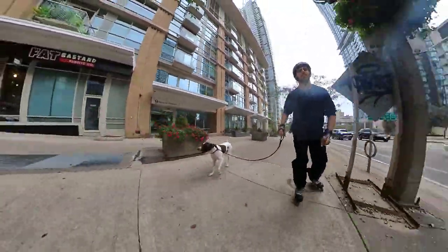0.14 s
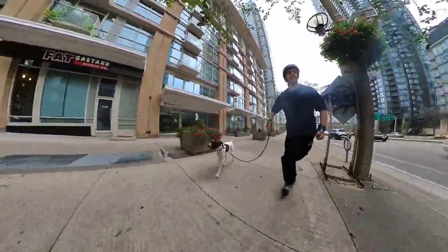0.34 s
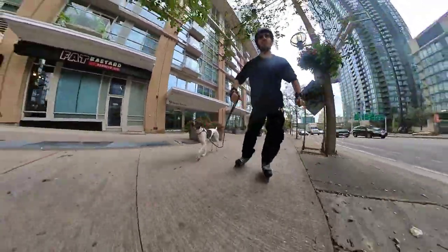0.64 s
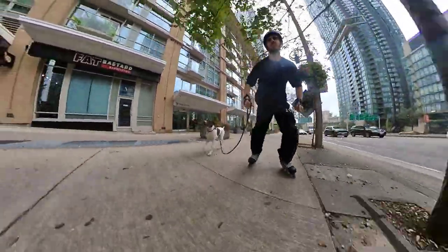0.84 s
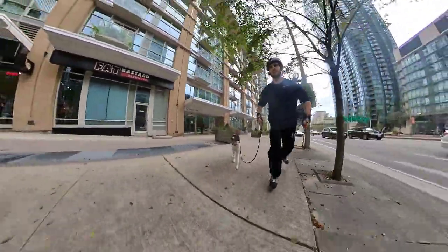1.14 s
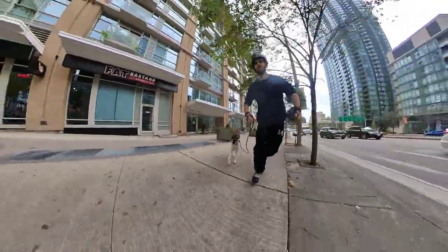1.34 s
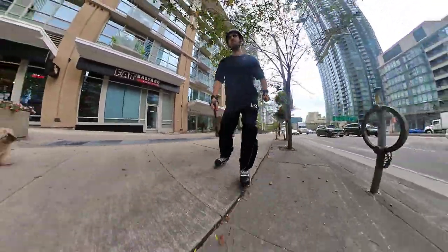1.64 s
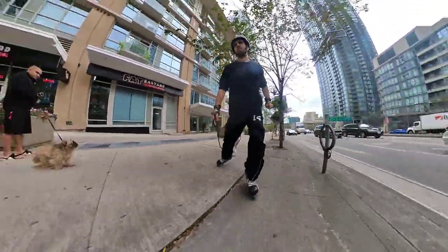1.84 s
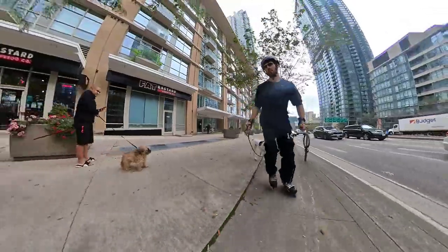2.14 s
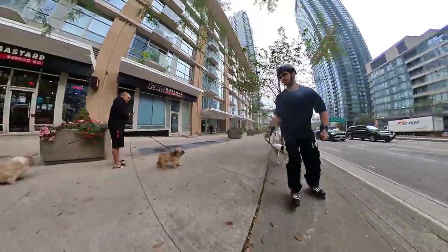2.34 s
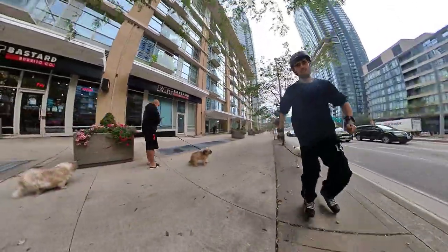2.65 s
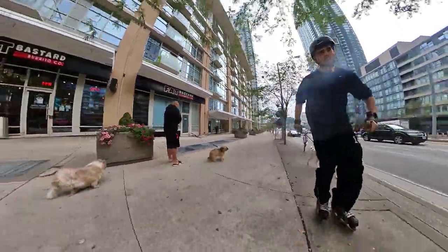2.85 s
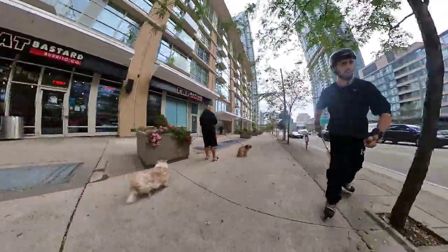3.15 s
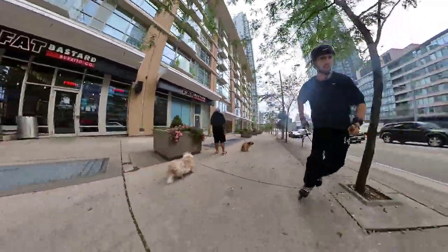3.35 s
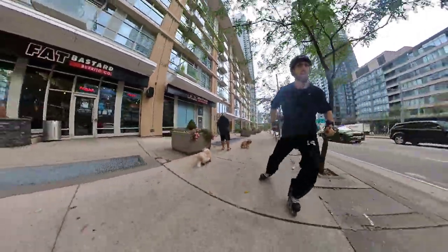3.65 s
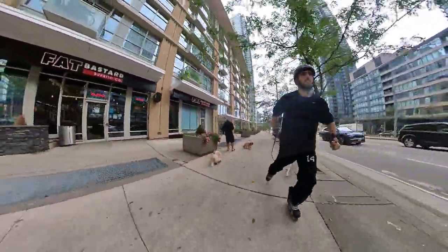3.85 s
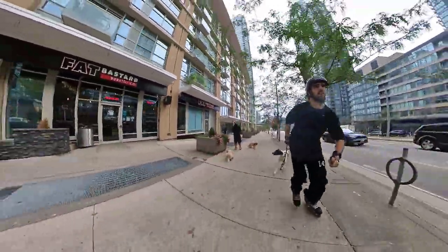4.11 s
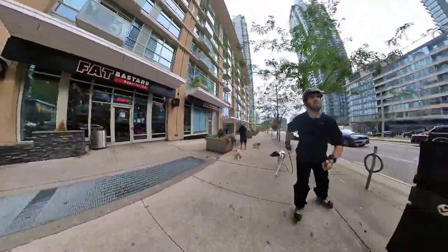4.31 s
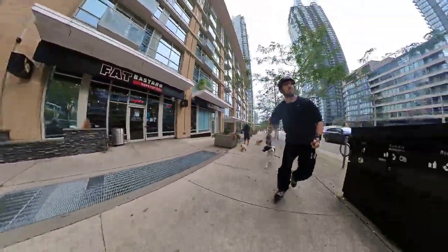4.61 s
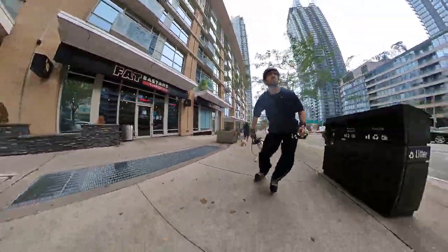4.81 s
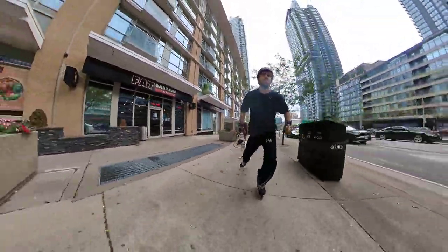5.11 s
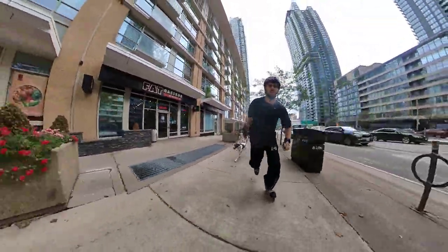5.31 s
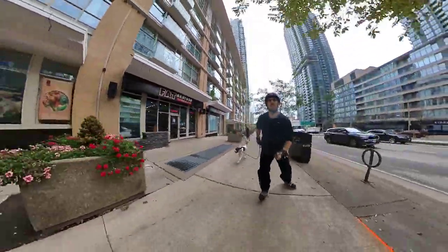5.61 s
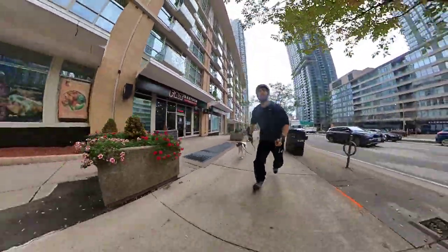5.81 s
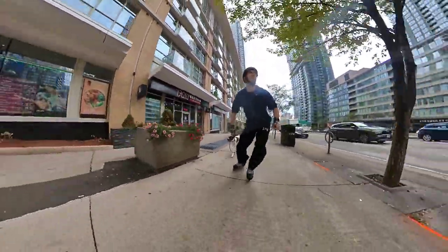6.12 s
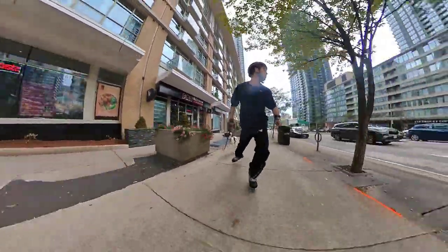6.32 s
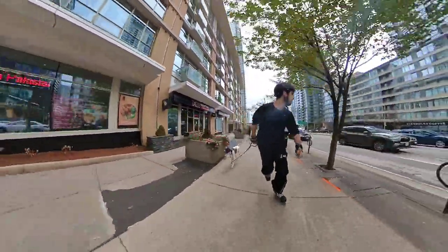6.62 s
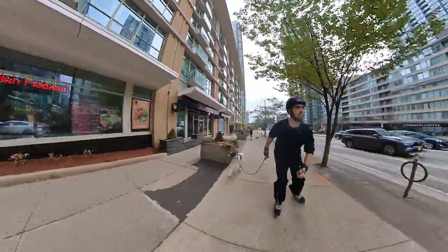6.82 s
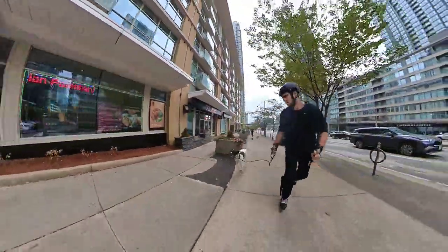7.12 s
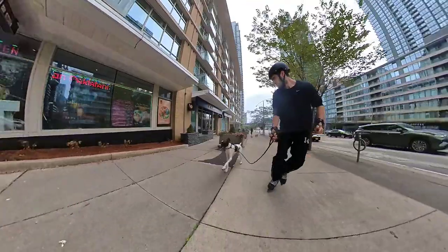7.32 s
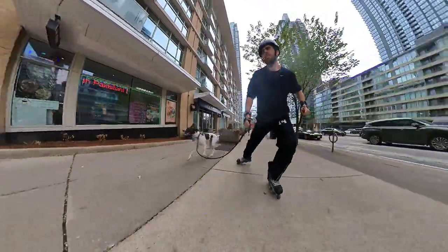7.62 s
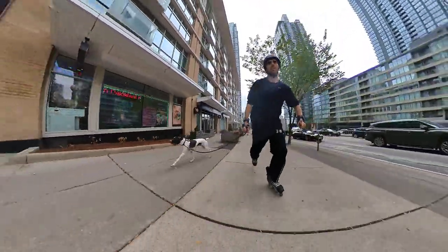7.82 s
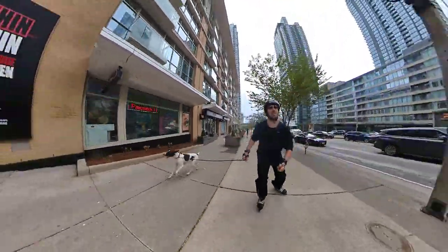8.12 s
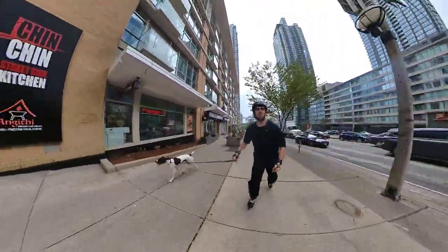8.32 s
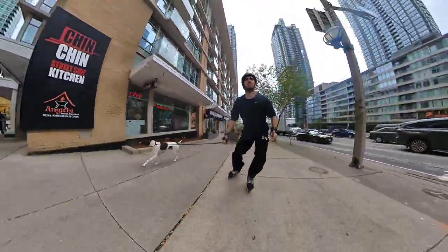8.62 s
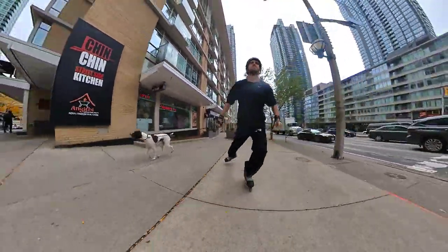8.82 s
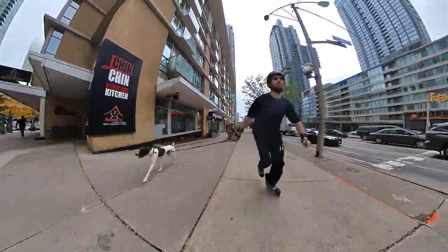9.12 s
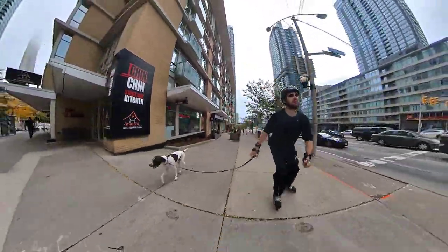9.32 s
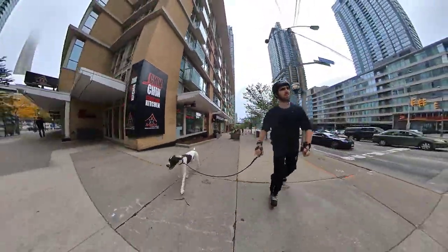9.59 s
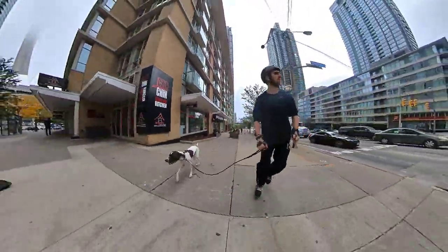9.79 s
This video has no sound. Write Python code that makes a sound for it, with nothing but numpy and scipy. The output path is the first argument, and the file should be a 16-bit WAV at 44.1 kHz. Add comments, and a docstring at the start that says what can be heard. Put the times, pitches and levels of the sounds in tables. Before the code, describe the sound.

A busy city road rumbles steadily and deeply, with droning engines rising and falling and a soft wash of tyres. Close in front, inline skates roar low and grainy over concrete with a thin fluttering hiss, swelling at pushes near 0.2, 1.2, 2, 2.7, 3.8, 4.9, 5.9, 7, 8 and 8.8 s. A low thud opens at 0.05, then hollow joint knocks at 0.8 to 1.5 and a double landing at 1.9. A rough dry squeal scrapes from 2.05 to 2.45; at 3.05 a heavy knock is followed by a loud bright metal snap. Duller knocks come at 4, 4.5 and 5.1, hard shell clacks at 5.75, three tiny high squeaks at 6.1 to 6.3 amid scuffing. A bright knock falls at 7, others at 8.3 and 9.45, with a soft thud at 9.15. From 7.5 an engine revs upward, then holds to the end. Faint shop-front echoes.

```python
"""On a concrete city pavement beside a busy road, someone rolls along on inline skates.
Random grit impacts, coloured and swelling with each push, make the wheels' roar and hiss.
Decaying boot notes make the knocks over slab joints; noise through resonances makes scuffs and squeals.
Coloured noise makes the deep traffic rumble and tyre wash; gliding sine notes make the engines.
Shop fronts throw back a little of the knocks, thuds, clicks and squeaks."""
import sys
import numpy as np
from scipy import signal
from scipy.fft import rfft, irfft
from scipy.io import wavfile
from scipy.ndimage import uniform_filter1d

SR = 44100
rng = np.random.default_rng(int(sys.argv[2]) if len(sys.argv) > 2 else 0)


def unload_audio(sound):
    """Save the sound as a 16-bit wav file, at the path given as the first command line argument."""
    columns = np.transpose(np.atleast_2d(sound))
    # keep every value between -1 and 1, then stretch to whole-number steps
    steps = np.round(np.clip(columns, -1, 1) * 32767)
    wavfile.write(sys.argv[1], SR, steps.astype(np.int16))


N = 438794
T = np.arange(N) / SR  # time in seconds

# Colour of gritty noise: pitch_hz [Hz], level_db [dB per Hz]
GRIT_COLOUR = [(1200, -3.5), (2500, -1.5), (3500, 5), (5000, 3), (6400, 1), (7200, -6), (8100, -14.5),
               (9000, -38)]
# The skater leans on a skate and pushes: start_s [s], length_s [s], roar_db [dB], grit_db [dB]
SKATE_PUSHES = [(0.154, .83, -31.5, -50), (1.201, 0.7, -34, -52), (2.061, 0.32, -44, -47.5),
                (2.653, 0.33, -40, -49.5), (3.8, 1.1, -32, -51), (4.913, 0.84, -33, -50),
                (5.867, .76, -30.5, -48), (7.015, 0.78, -28.5, -49.5), (7.969, 1, -31, -52),
                (8.819, 1.1, -28.5, -50.5)]


def undb(db):
    """Turn decibels into a gain."""
    return 10 ** (np.asarray(db) / 20)


def unit(x):
    """Scale a sound to an average (rms) level of 1."""
    return x / np.sqrt(np.mean(x ** 2))


def colour(x, points):
    """Shape a sound's spectrum by (Hz, dB) points, falling steeply outside them."""
    hz, db = np.transpose(points)
    f = np.log(np.fft.rfftfreq(len(x), 1 / SR) + 1)
    outside = np.abs(f - np.clip(f, np.log(hz[0]), np.log(hz[-1])))
    gain = undb(np.interp(f, np.log(hz), db) - 73.0 * outside)  # about 51 dB per octave outside
    return irfft(rfft(x) * gain, len(x))


def resonate(x, hz, width):
    """Pass a sound through one resonance, with gain 1 at its centre."""
    return signal.lfilter(*signal.iirpeak(hz, hz / width, fs=SR), x)


def walk(rate):
    """Slow chance: random levels, each held for 1 / rate seconds, then smoothed twice."""
    k = int(SR / rate)
    steps = np.repeat(rng.standard_normal(N // k + 1), k)
    return unit(uniform_filter1d(uniform_filter1d(steps, k), k)[:N])


def gate(start, end, fade):
    """Let sound through from start to end, with soft edges."""
    opening = np.clip((T - start) / fade + .5, 0, 1)
    closing = np.clip((end - T) / fade + .5, 0, 1)
    return opening * closing


def grains(rate, spread_db):
    """Tiny impacts at random moments, a few much bigger than the rest."""
    sizes = undb(spread_db * np.minimum(rng.standard_exponential(N), 5))
    return unit((rng.random(N) < rate / SR) * sizes * rng.choice([-1, 1], N))


def strike(t, decay):
    """Loudness of a blow: a very fast rise, then a decay."""
    return (1 - np.exp(-t / .0003)) * np.exp(-t / decay)


def add(out, s, sound):
    """Mix a sound in, starting at s seconds."""
    i = max(int(s * SR), 0)
    out[i:i + len(sound)] += sound[:N - i]


def passing(table, far_db):
    """Gain of things that go by, falling as 1 / distance, over a steady far level."""
    power = undb(far_db) ** 2
    for s, width, db in table:
        power = power + undb(db) ** 2 / (1 + ((T - s) / width) ** 2)
    return np.sqrt(power)


def far_engines(count):
    """Engines further along the road, each drifting in speed and fading in and out."""
    out = np.zeros(N)
    for hz in np.geomspace(68, 160, count):
        phase = 2 * np.pi * np.cumsum(hz * (1 + .04 * walk(2))) / SR
        fading = undb(3 * walk(4))
        notes = np.sin(phase) + .35 * np.sin(2 * phase) + .1 * np.sin(3 * phase)
        out += unit(fading * notes) / np.sqrt(hz)  # higher engines are softer
    return unit(out)


def engine(curve, overtones_db):
    """Gliding revs drive a firing note, its octave droning in the exhaust and weak overtones."""
    glide_s = .12  # an engine's inertia smooths its changes of speed
    s, *columns = np.transpose(curve)
    hz, firing_db, drone_db = (np.interp(T, s, column) for column in columns)
    hz = uniform_filter1d(hz, int(glide_s * SR))
    phase = 2 * np.pi * np.cumsum(hz * (1 + .009 * walk(14))) / SR
    firing = undb(firing_db + 1.3 * walk(20)) * np.sin(phase)
    overtones = sum(np.sin(k * phase + rng.uniform(0, 2 * np.pi)) / k for k in range(3, 7))
    drone = np.sin(2 * phase) + undb(overtones_db) * overtones
    exhaust = undb(drone_db + 1.3 * walk(12) + 1.6 * walk(45)) * drone
    return np.sqrt(2) * (firing + exhaust) * gate(s[0], s[-1], fade=0.12)


def traffic():
    """Deep rumble, a mingle of far engines, the wash of passing tyres, and near engines in turn."""
    # Colours of the deepest rumble, the road's rumble and the tyres: pitch_hz [Hz], level_db [dB per Hz]
    deep_colour = [(18, -23.5), (30, -12.5), (41, -9), (52, -5.5), (65, -6.5), (90, -19.5)]
    rumble_colour = [(45, -11), (65, -6.5), (85, 0), (125, -1.5), (165, -1.5), (250, -5.5), (330, -14),
                     (600, -32)]
    tyre_colour = [(400, -20.5), (750, 4.5), (1000, 4), (1300, 0), (1650, -6), (2200, -8.5), (2900, -11),
                   (4000, -28.5), (7000, -26)]
    # Swells of the deepest rumble, clusters of engines going by, tyres of passing cars:
    # nearest_s [s], width_s [s to 3 dB down on either side, sign ignored], level_db [dB]
    deep_swells = [(.45, -0.3, -25.5), (2.3, 0.98, -26), (4.0, 0.35, -27.5), (5.65, 0.76, -26.5),
                   (6.55, 0.08, -23), (9.0, 1.66, -31.5)]
    engine_passes = [(.55, 0.7, -24), (3.7, -0.03, -26.5), (4.7, 1, -28.5), (6.9, 0.8, -27.5),
                     (8.2, 1, -26.5)]
    car_passes = [(1.2, 0.78, -37), (4.4, .5, -38.5), (5.9, 0.895, -35), (7.25, 0.16, -38.5),
                  (8.9, 0.11, -34)]
    # Near engines, one curve for each stretch of steady running, so a vehicle may take several: time_s [s],
    # firing_hz [Hz], firing_db [dB], drone_db [dB]
    near_curves = [
        [(0, 46, -30, -38), (.5, 47, -23.5, -38), (.8, 55, -25, -38), (1.05, 58, -21.5, -38),
         (1.3, 54, -23, -38), (1.45, 62, -26, -38)],
        [(1.72, 65, -25, -42), (2.05, 64, -22, -42), (2.3, 57, -31, -42), (2.6, 54, -28, -42),
         (2.85, 52, -25, -42)],
        [(1.4, 62, -28, -40), (1.62, 83, -26, -29), (1.85, 95, -28, -30), (2.1, 98, -33, -30),
         (2.3, 99.5, -22.5, -27), (2.7, 97.5, -25, -32), (3.05, 95, -27, -30), (3.25, 92, -23, -40)],
        [(1.42, 110, -38, -34), (1.62, 129.5, -40, -29.5), (1.85, 132, -42, -30), (2.15, 131, -42, -37),
         (2.55, 131, -31, -35), (3.0, 131, -33, -36), (3.3, 132, -32, -37), (3.45, 131.5, -31, -29),
         (3.8, 129, -40, -36), (4.1, 127.5, -38, -26.5), (4.35, 129, -36, -33), (4.5, 128, -38, -42)],
        [(2.5, 68, -40, -29), (2.9, 74, -40, -29), (3.25, 81.5, -36, -29), (3.55, 83.5, -34, -28)],
        [(3.2, 130, -42, -28), (3.3, 120, -38, -24.5), (3.46, 105, -38, -29)],
        [(4.15, 111, -27.5, -40), (4.6, 114, -27, -39), (4.95, 121, -26.5, -30), (5.4, 120, -31, -34),
         (5.9, 117, -31, -37), (6.1, 116, -30, -29), (6.35, 116, -34, -27.5), (6.5, 116, -36, -38)],
        [(4.4, 70, -32, -32), (4.65, 72, -34, -28), (4.9, 73, -36, -40), (5.2, 73.5, -35, -34),
         (5.75, 72, -38, -34)],
        [(5.3, 45, -28, -42), (5.6, 44, -26.5, -40), (6.1, 45, -30, -38), (6.6, 43, -24.5, -40),
         (7.0, 42.5, -24, -42), (7.5, 43, -27, -42)],
        [(7.15, 70, -28, -30), (7.3, 66, -22.5, -32), (7.5, 62, -34, -40), (7.7, 68, -23, -38),
         (7.85, 76, -23, -40), (8.0, 78, -32, -40), (8.12, 72, -22, -34), (8.25, 75, -32, -28),
         (8.5, 75, -40, -34)],
        [(7.48, 49, -36, -31), (7.65, 58, -36, -26), (7.85, 73, -32, -26), (8.0, 87, -31, -23),
         (8.25, 96, -28, -25), (8.55, 97.3, -29, -25), (8.9, 99.5, -28, -25.5), (9.2, 98.7, -26, -27),
         (9.55, 100, -24, -30), (10, 99.5, -23, -32)],
        [(8.9, 89, -38, -36), (9.4, 92, -38, -31), (10, 91.5, -36, -31)],
    ]
    far_tyres_db, far_deep_db, far_engines_db = -37, -31.3, -23.5  # the steady road behind them

    deep = unit(colour(rng.standard_normal(N), deep_colour)) * passing(deep_swells, far_deep_db)
    rumble = unit(colour(rng.standard_normal(N), rumble_colour))
    mingle = .8 * rumble + .6 * far_engines(count=12)
    tyres = unit(colour(rng.standard_normal(N), tyre_colour)) * passing(car_passes, far_tyres_db)
    tyres = tyres * undb(0.57 * walk(9))
    near = sum(engine(curve, overtones_db=-10) for curve in near_curves)
    return deep + mingle * passing(engine_passes, far_engines_db) + tyres + near


def fronts(x, wet_db, t60):
    """Scattered echoes from the shop fronts, fading by 60 dB in t60 seconds and duller than the direct sound."""
    t = T[:SR // 2]
    tail = colour(rng.standard_normal(len(t)), [(100, 1), (5000, 1.5), (9000, -8)])
    tail = tail * undb(-60 * t / t60) * (t > .012)  # the first echo needs 12 ms
    return x + undb(wet_db) * signal.fftconvolve(x, tail / np.linalg.norm(tail))[:N]


def squeaks():
    """Thin chirps that swell in a few milliseconds and sag in pitch."""
    # Short squeaks: start_s [s], pitch_hz [Hz, around which it sags and wavers], peak_db [dB]
    chirps = [(6.119, 6480, -38.5), (6.194, 6395, -36.5), (6.296, 6275, -34.5)]
    out, t = np.zeros(N), T[:2048]
    for s, hz, db in chirps:
        rise = t / 0.00507  # loudest at 1
        sag = 0.038 * (np.exp(-rise) - .3)
        pitch = hz * (1 + sag + 0.017 * walk(700)[:len(t)])
        swell = rise * np.exp(1 - rise)
        add(out, s, undb(db) * swell * np.sin(2 * np.pi * np.cumsum(pitch) / SR))
    return out


def squeals():
    """A dry wheel sticks and slips: thin, rough notes that start at once and keep breaking up."""
    # Squealing notes: start_s [s], end_s [s], pitch_hz [Hz], level_db [dB]
    notes = [(0.02, .19, 2494, -51), (0, .17, 2987, -51.5), (2.04, 2.43, 2915, -47),
             (2.06, 2.45, 2560, -46)]
    width_share, flicker_db = .042, 1.3  # width of each resonance as a share of its pitch
    rub, out = grains(rate=3000, spread_db=2.0), np.zeros(N)
    for start, end, hz, db in notes:
        width = width_share * hz
        note = resonate(resonate(rub, hz, width), hz, width)
        broken = unit(note * undb(flicker_db * walk(25)))
        out += broken * undb(db) * gate(start, end, fade=.025)
    return out


def whirrs():
    """Wheels scuffing sideways and dry bearings excite narrow resonances, with an uneven grip."""
    # Scuffs and whirrs: start_s [s], end_s [s], pitch_hz [Hz],
    # width_hz [Hz, of each of two resonances in a row], level_db [dB]
    rubs = [(0, .2, 2730, 1600, -46), (0, .18, 6350, 400, -53), (0.181, .85, 4325, 600, -51),
            (1.05, 1.95, 4235, 300, -57.5), (1.406, 1.609, 2747, 1400, -42.5), (1.62, 1.93, 3050, 900, -49),
            (2.11, 2.18, 2920, 350, -44), (2.077, 2.454, 6420, 400, -56), (2.649, 3.052, 2790, 1200, -46.5),
            (2.69, 2.82, 5980, 900, -47.5), (3.88, 4.25, 3880, 600, -51.5), (8.0, 9.95, 3987, 700, -55.5),
            (6.798, 7.3, 2213, 600, -47), (3.9, 5.6, 5240, 602, -53), (5.735, 5.8, 4450, 1000, -45),
            (6.148, 6.599, 923, 200, -40.5), (6.15, 6.601, 4790, 220, -57), (7.02, 7.75, 1316, 100, -43),
            (7.05, 9.05, 4810, 320, -51), (7.5, 7.752, 5040, 350, -51.5), (9.6, 9.95, 4810, 240, -57)]
    rub, out = grains(rate=4000, spread_db=3.0), np.zeros(N)
    for start, end, hz, width, db in rubs:
        note = unit(resonate(resonate(rub, hz, width), hz, width))
        out += note * undb(db) * gate(start, end, fade=0.08)
    grip = unit(undb(1.5 * walk(40) + 1.5 * walk(9)))
    return out * grip


def clicks():
    """Grit snaps dully under a wheel; metal snaps brightly, and both ring briefly."""
    # Hard clicks: start_s [s], level_db [dB, before the blow's fade], brightness [0 grit to 1 metal]
    snaps = [(1.143, -33, 0), (1.907, -36, .9), (2.133, -38, 0), (2.667, -33.5, 0), (2.887, -33, 0),
             (3.052, -30, .1), (3.1272, -13.8, 1), (3.140, -26, .5), (3.165, -34, .7), (8.297, -37, 0)]
    # Colour of a metal snap: pitch_hz [Hz], level_db [dB per Hz]
    metal_colour = [(300, 3), (600, 5), (850, 3), (1250, 14), (1900, 0), (2900, 1), (3500, 4.5), (4400, 5),
                    (5500, 4), (7000, -2), (7800, 0), (8500, -7), (9200, -28)]
    out, t = np.zeros(N), T[:4096]
    for s, db, bright in snaps:
        noise, bright = rng.standard_normal(len(t)), np.clip(bright, 0, 1)
        mix = bright * colour(noise, metal_colour) + (1 - bright) * colour(noise, GRIT_COLOUR)
        snap = unit(mix) * strike(t, .0018)
        ring = unit(resonate(noise, 6500, 300) + .6 * resonate(noise, 5500, 300)) * strike(t, .012)
        add(out, s, undb(db) * (snap + 0.097 * ring))
    return out


def thuds():
    """A skate set down flat lands softly: one low swing that dies within a cycle."""
    # Soft landings: start_s [s, one cycle before the peak], pitch_hz [Hz], peak_db [dB]
    landings = [(0.0435, 200, -7), (1.899, 240, -14), (1.923, 200, -11), (3.0445, 260, -13),
                (9.1435, 230, -13)]
    out, t = np.zeros(N), T[:1024]
    for s, hz, db in landings:
        cycles = t * hz - 1  # 0 at the peak
        add(out, s, undb(db) * np.cos(2 * np.pi * cycles) * np.exp(-(2 * cycles) ** 2))
    return out


def knocks():
    """A wheel drops into a joint: sole thuds, shell clacks, rim ticks, and the next wheel follows softly."""
    # Wheels knocking over joints and landing: start_s [s], peak_db [dB, without the tick],
    # contact_hz [Hz that the point of contact favours], shell_db [dB, shell notes against the sole],
    # tick_db [dB, rim's tick against the body]
    blows = [(0.809, -16, 700, -4, -20), (0.961, -16.5, 510, -7, -24), (1.142, -17.5, 460, -5, -23),
             (1.478, -18.5, 520, -3, -20), (1.901, -18, 300, -10, -23), (1.925, -16.5, 520, -8, -23.5),
             (3.047, -12.5, 540, -8, -14.5), (3.993, -15.5, 340, -12, -22), (4.462, -17.5, 1296, 0, -23),
             (5.138, -17.5, 500, -5, -26), (5.734, -13, 1150, 1, -11.5), (5.7925, -14, 1120, 1.5, -19),
             (7.030, -15, 1315, 7, -27), (8.334, -17.5, 800, -3, -23), (9.448, -15.5, 400, -10, -27.5)]
    # Notes a boot rings with, sole first, then shell, before chance shifts them a little:
    # pitch_hz [Hz], level_db [dB], t60_s [s to fade by 60 dB]
    boot_notes = [(277.88, 1.5, 0.026), (375, -3, 0.021), (545.5, 0, 0.038), (616, -3.5, 0.027),
                  (770, -6, 0.028), (1030, -3, 0.04), (1220, -5.5, .03), (1318, -3.5, 0.031),
                  (1860, -10, 0.017), (2670, -12.5, 0.028)]
    # Colours of a rim ticking on concrete and of the wheel's dull thump: pitch_hz [Hz], level_db [dB per Hz]
    tick_colour = [(1500, -0.5), (3200, -3.5), (4500, 4.5), (5500, -6), (7000, -9.5), (9000, -26)]
    thump_colour = [(100, 4.5), (300, 2), (700, -2), (1400, -10.5), (2500, -22.5)]
    contact_db, contact_octaves = 7, .35  # how much and how widely contact favours its notes
    thump_db, thump_decay_s = -0.5, .008
    next_wheel_s, next_wheel_share = .03, 0.3

    out, t = np.zeros(N), T[:4096]
    hz, db, t60 = np.transpose(boot_notes)[:, :, None]
    for s, peak_db, contact_hz, shell_db, tick_db in blows:
        level_chance, pitch_chance = rng.standard_normal((2, len(boot_notes), 1))
        favoured = np.exp(-(np.log2(hz / contact_hz) / contact_octaves) ** 2)
        # notes above 900 Hz belong to the shell
        note_db = db + 2 * level_chance + (hz > 900) * shell_db + contact_db * favoured
        swing = np.sin(2 * np.pi * hz * (1 + 0.016 * pitch_chance) * t)
        ring = np.sum(undb(note_db - 60 * t / t60) * swing, axis=0) * strike(t, 0.98)
        tick = colour(rng.standard_normal(len(t)), tick_colour) * strike(t, 0.005)
        thump = colour(rng.standard_normal(len(t)), thump_colour) * strike(t, thump_decay_s)
        body = ring / np.abs(ring).max() + undb(thump_db) * thump / np.abs(thump).max()
        blow = body / np.abs(body).max() + undb(tick_db) * tick / np.abs(tick).max()
        blow = undb(peak_db) * blow
        add(out, s, blow)
        add(out, s + next_wheel_s, next_wheel_share * blow)
    return out


def patches():
    """Coarse concrete rattles a wheel: sparse, heavy grains swell in one broad resonance of the boot."""
    # Coarse patches: middle_s [s], length_s [s between points about 4 dB down],
    # pitch_hz [Hz that the boot favours], level_db [dB at the middle]
    coarse = [(0.251, .07, 430, -30), (.69, .14, 800, -38), (0.839, .12, 400, -30.5),
              (.80, .08, 1300, -38.5), (1.281, 0.065, 1146, -36), (1.486, .09, 800, -33),
              (1.85, .1, 1243, -37.5), (3.536, .12, 429, -31.5), (3.75, .09, 747, -33),
              (3.95, .14, 600, -33), (4.25, .2, 850, -38), (4.681, .06, 890, -35), (5.241, .07, 847, -34),
              (6.378, .06, 1200, -38), (6.57, 0.092, 426, -30), (6.9, .35, 400, -31), (7.22, .14, 648, -32),
              (9.3, .5, 618, -37)]
    rattle, out = grains(rate=2000, spread_db=1.5), np.zeros(N)
    for s, length, hz, db in coarse:
        width = .5 * hz
        note = unit(resonate(resonate(rattle, hz, width), hz, width))
        out += note * undb(db) * np.exp(-2 * ((T - s) / length) ** 2)
    return out


def pushed(coast_db, push_dbs):
    """Gain of a rolling noise: every push adds its power to that of coasting."""
    lean_s, lift_s = .08, 0.16  # weight comes on and off a skate
    power = undb(coast_db) ** 2
    for (start, length, _, _), db in zip(SKATE_PUSHES, push_dbs):
        leaning = np.clip((T - start) / lean_s + .5, 0, 1)
        lifting = np.clip((start + length - T) / lift_s + .5, 0, 1)
        power = power + leaning * lifting * undb(db) ** 2
    return np.sqrt(power)


def speckle(x, patchy_db, rate):
    """The contact patch keeps shifting, so each narrow band of the grit comes and goes by itself."""
    spectrum, f = rfft(x), np.fft.rfftfreq(N, 1 / SR)
    place = np.interp(f, np.geomspace(1500, 9000, 18), np.arange(18))
    out = np.zeros(N)
    for k in range(18):
        band = irfft(spectrum * np.maximum(1 - np.abs(place - k), 0), N)
        out += band * undb(patchy_db * walk(rate))
    return unit(out)


def rolling():
    """Rough concrete shakes the boots and grit crackles; both swell with each push and flutter as wheels turn."""
    # Colour of the wheels' roar: pitch_hz [Hz], level_db [dB per Hz]
    roar_colour = [(120, -14), (230, 0), (310, 0.5), (420, -1.5), (560, -5), (780, -8.5), (1100, -16),
                   (1800, -20.5), (4000, -41.5)]
    coast_roar_db, coast_grit_db = -29.5, -47.5  # the wheels between pushes
    wheel_turn_hz = 17  # middle of a drifting speed
    _, _, roar_dbs, grit_dbs = np.transpose(SKATE_PUSHES)
    turn = np.sin(2 * np.pi * np.cumsum(wheel_turn_hz + 2 * walk(3)) / SR)
    texture = walk(14)  # rougher and smoother patches of pavement

    roar = unit(colour(grains(rate=5000, spread_db=2.0), roar_colour))
    roar = roar * pushed(coast_roar_db, roar_dbs) * undb(0.25 * turn + 0.63 * texture)

    grit, wide = (unit(colour(grains(rate=9000, spread_db=1.0), GRIT_COLOUR)) for _ in range(2))
    grit = speckle(grit, patchy_db=2.5, rate=60)
    flutter = undb(0.86 * turn + 0.89 * walk(60) + 0.5 * texture)
    grit_gain = pushed(coast_grit_db, grit_dbs) * flutter
    # only a band of the hiss spreads to the sides
    side_colour = [(2400, -59.5), (3000, -6.5), (4500, -2.5), (5600, -3.5), (6500, -34.0), (8500, -24.5)]
    wide = colour(wide, side_colour)
    return roar + grit * grit_gain, wide * grit_gain


def scene():
    """Everything is heard in the middle but for some width in the hiss."""
    roll, wide = rolling()
    road = traffic()
    echoed = fronts(knocks() + thuds() + clicks() + squeaks(), wet_db=-19.5, t60=0.54)
    mid = roll + patches() + whirrs() + squeals() + road + echoed
    return np.array([mid + wide, mid - wide])


def record(dry):
    """A quick gain control slightly evens out the bass, and the top is cut."""
    top_hz = 9150
    bass = signal.sosfiltfilt(signal.butter(2, 260, fs=SR, output="sos"), dry)
    power = uniform_filter1d(np.mean(bass ** 2, axis=0), int(0.023 * SR)) + 1e-9
    bass_gain = (np.mean(power) / power) ** 0.033
    held = dry + bass * (bass_gain - 1)
    return signal.sosfilt(signal.ellip(8, .2, 70, top_hz, fs=SR, output="sos"), held)


dry = scene()
out = record(dry)
unload_audio(out)
```